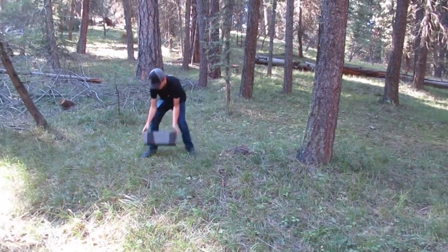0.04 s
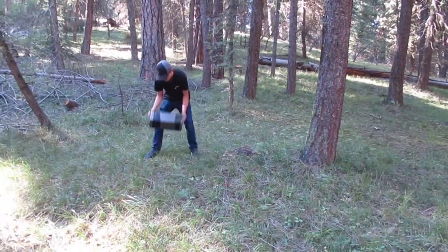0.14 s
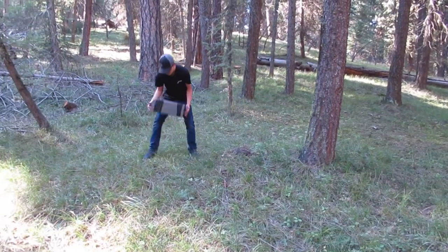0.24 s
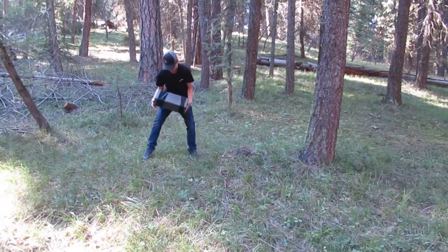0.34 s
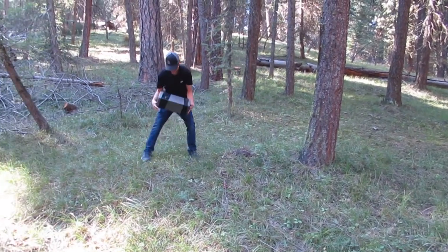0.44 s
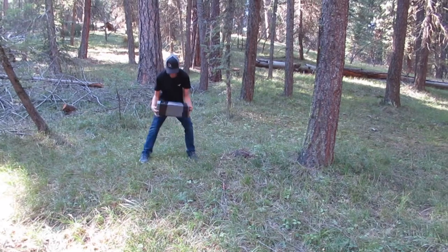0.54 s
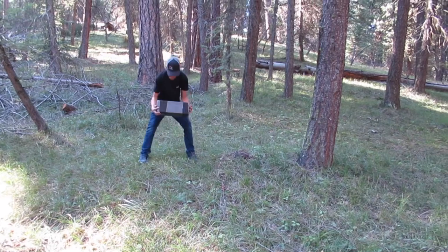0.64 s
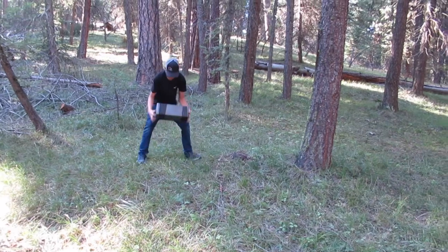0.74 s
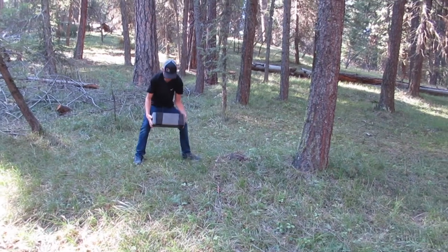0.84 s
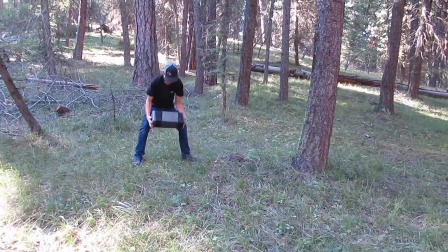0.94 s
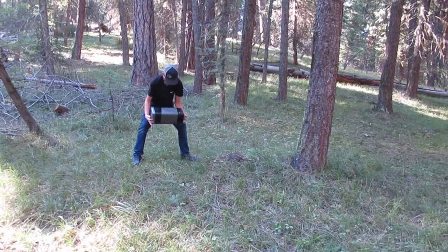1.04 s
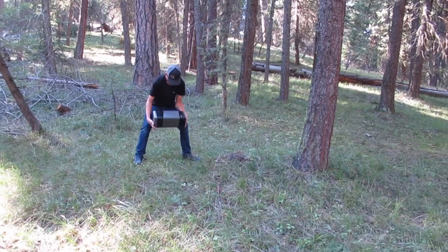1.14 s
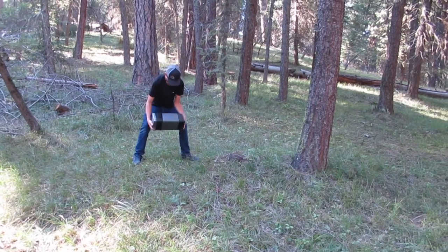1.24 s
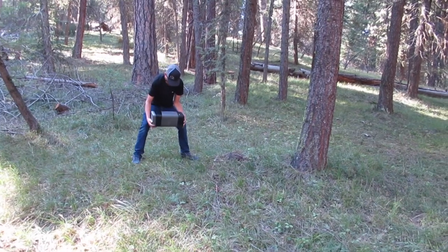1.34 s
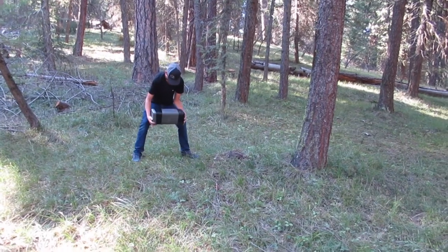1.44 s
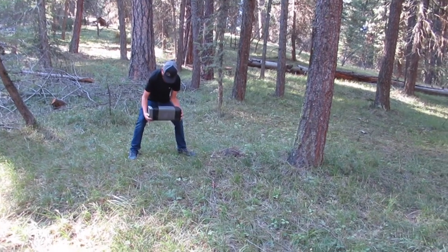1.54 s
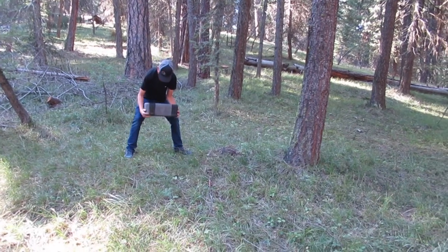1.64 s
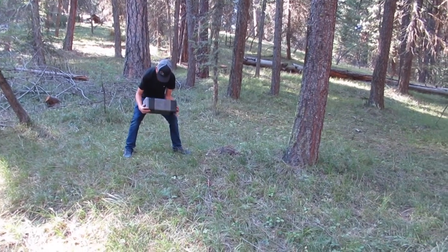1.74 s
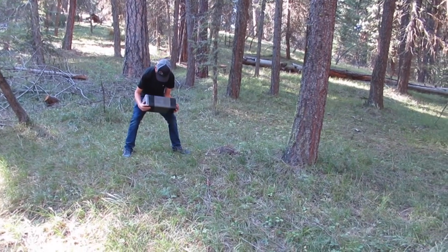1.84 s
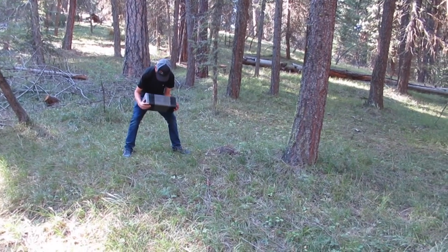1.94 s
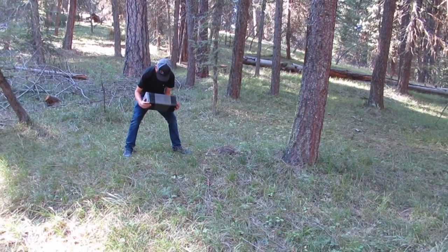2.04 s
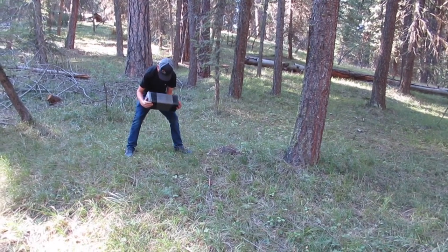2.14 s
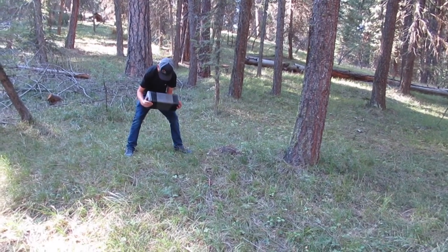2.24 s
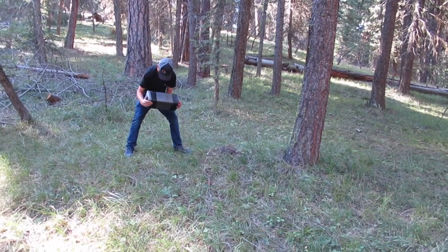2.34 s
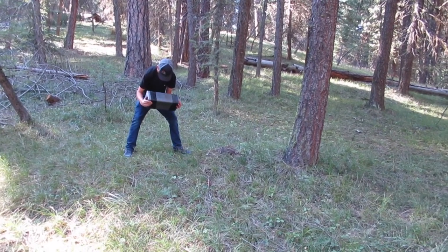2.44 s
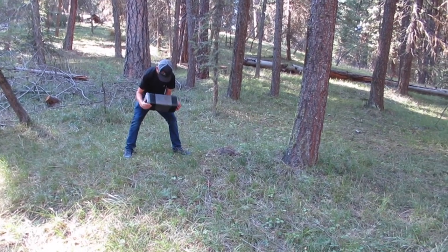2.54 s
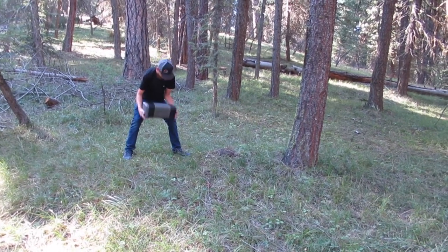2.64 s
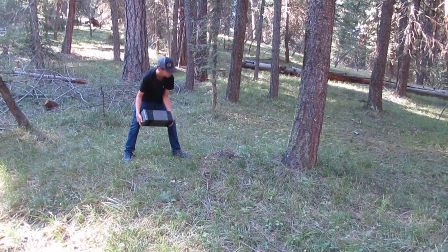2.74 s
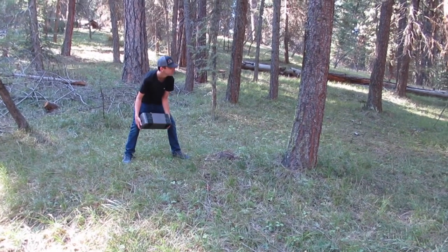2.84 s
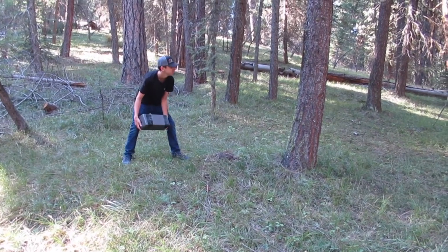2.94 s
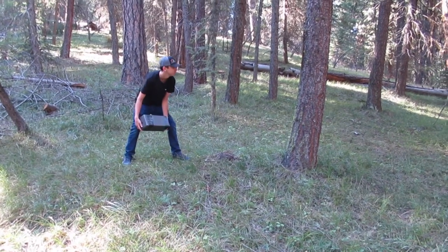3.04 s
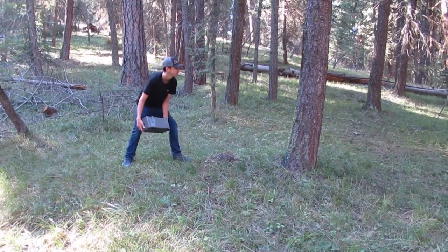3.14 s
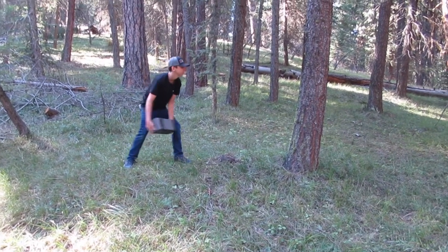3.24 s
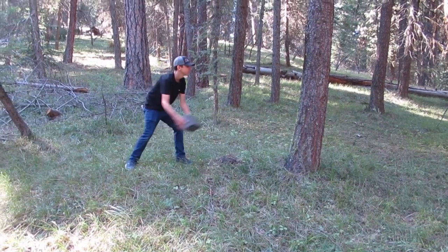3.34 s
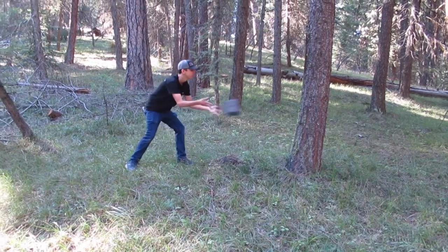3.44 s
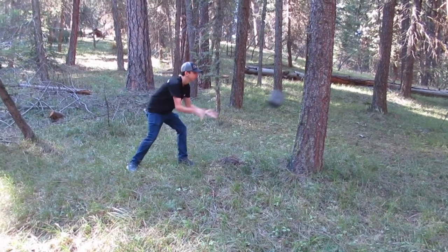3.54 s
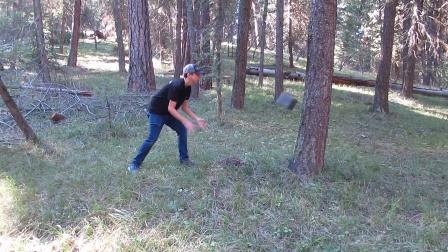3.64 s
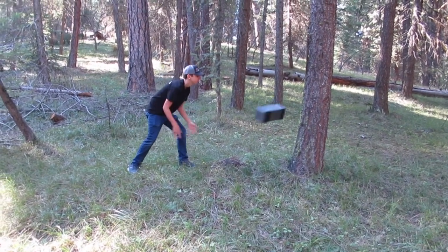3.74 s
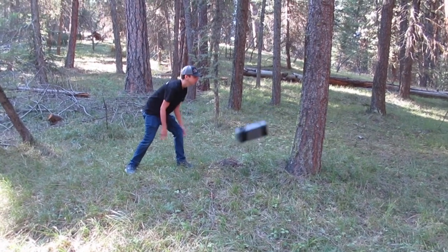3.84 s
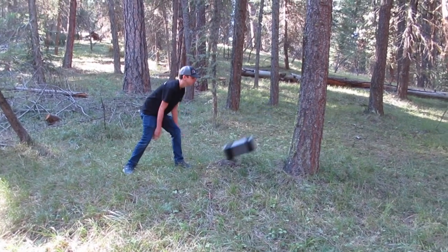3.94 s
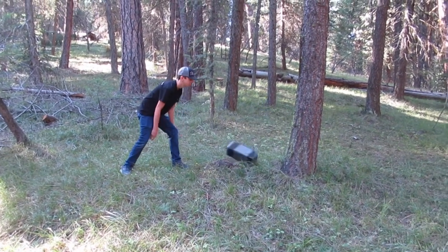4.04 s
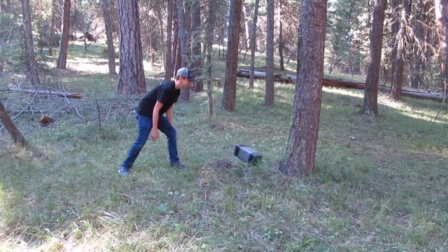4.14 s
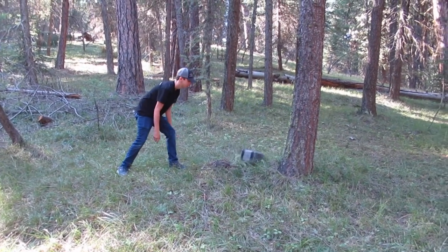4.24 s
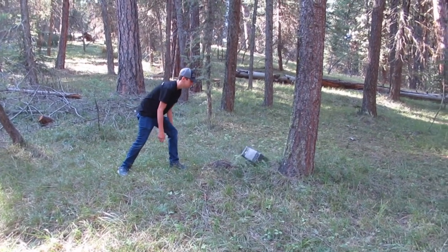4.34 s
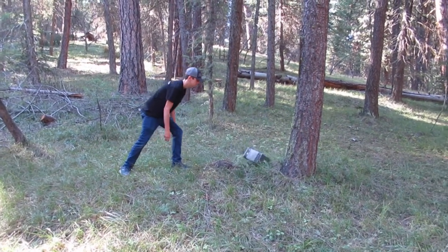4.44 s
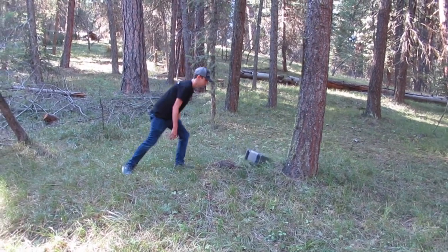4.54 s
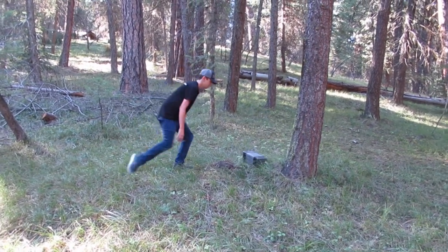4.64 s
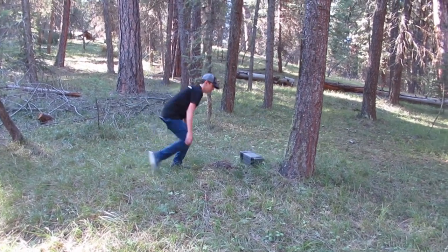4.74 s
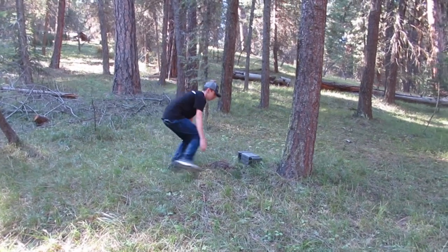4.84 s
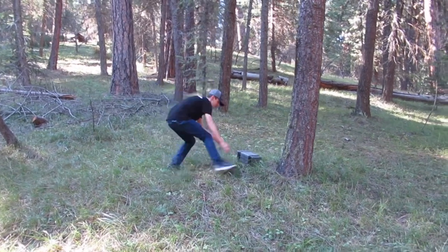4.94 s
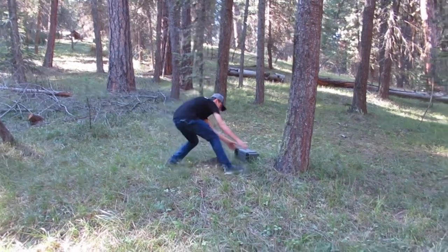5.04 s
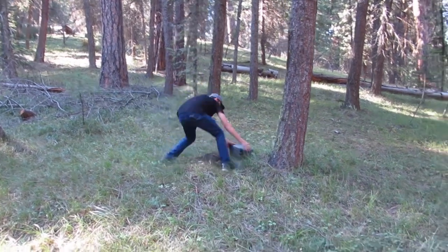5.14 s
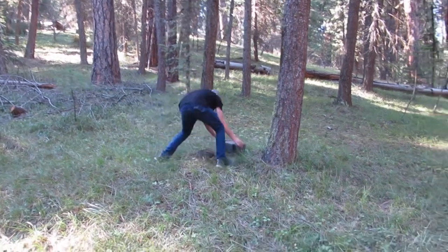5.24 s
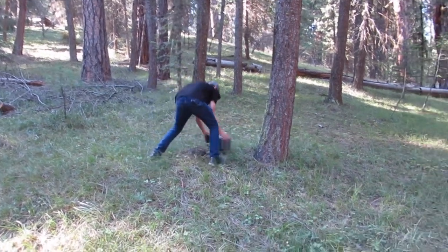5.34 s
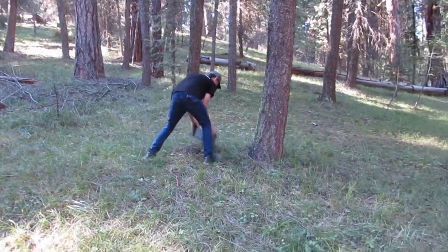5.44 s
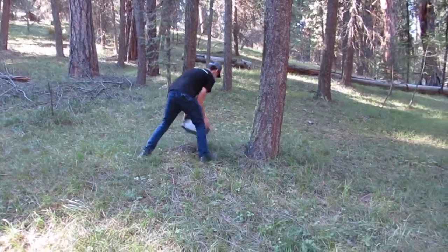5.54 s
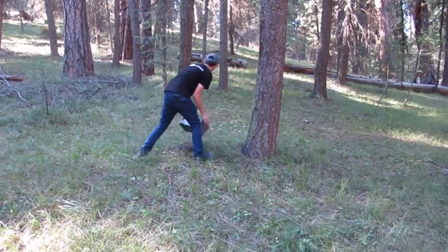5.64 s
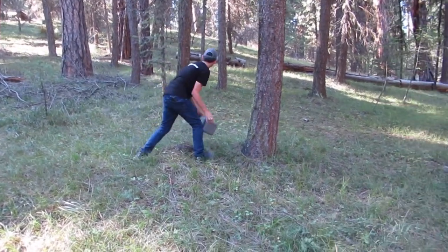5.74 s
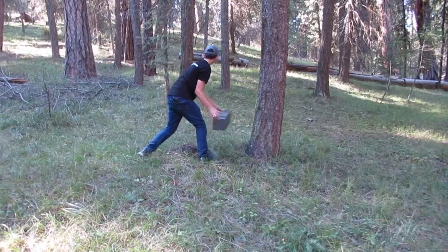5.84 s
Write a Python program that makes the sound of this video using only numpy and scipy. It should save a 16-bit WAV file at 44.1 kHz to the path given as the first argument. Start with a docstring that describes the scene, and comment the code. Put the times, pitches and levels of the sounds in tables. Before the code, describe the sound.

A stiff hollow box cracks loudly on a tree trunk, drops with a second knock and tumbles through dry grass in a quiet forest.

```python
"""A stiff cardboard box cracks on a tree trunk, drops and tumbles through grass: ringing walls, pumped air, crushed fibre.
Before the throw a man turns it in his hands (scuffs, grit and hollow taps) in a quiet forest.
Afterwards he steps over twigs, lifts the box and treads down heavily: snaps, thuds, crushed litter and brushed blades.
Trunks scatter the sounds back to a camera microphone, over a faint hush of treetops and hiss.
The camera's limiter ducks after the loudest blow and recovers slowly."""
import sys
import numpy as np
from scipy import signal
from scipy.fft import rfft, irfft
from scipy.io import wavfile
from scipy.ndimage import uniform_filter1d

SR = 44100
rng = np.random.default_rng(int(sys.argv[2]) if len(sys.argv) > 2 else 0)


def generate_wav(signal):
    """Clip the signal to [-1, 1] and save it as 16-bit WAV at the path in sys.argv[1]."""
    frames = np.transpose(np.atleast_2d(signal))
    scaled = np.clip(frames, -1, 1) * 32767
    pcm = np.round(scaled).astype(np.int16)
    wavfile.write(sys.argv[1], SR, pcm)


N = 259616
TIME = np.arange(N) / SR  # s
AGE = TIME[:SR // 4]  # time since a contact, s


# Ringing modes of the box walls: f/Hz, t60/s, level/dB struck on an end, level/dB struck on a side
WALL_MODES = [(262, 0.071, -0.5, -23.5), (345, 0.059, 6.5, -23.5), (485, 0.048, 5.5, -26),
              (584, 0.056, 13, -23.5), (692, 0.057, -18, -5), (760, 0.023, -13, -5), (1070, 0.03, -18, -14),
              (1152, 0.059, -6, -8), (1262, 0.093, -8, -32), (1420, 0.033, -33, -65),
              (1595, 0.048, 15, -53), (1690, 0.037, -14, -23), (1813, 0.064, -17, -19),
              (2273, 0.038, -3, -14.5), (2377, 0.061, -9.5, -31), (2800, .05, -38, -51),
              (2910, 0.12, -52, -40), (2990, 0.061, -25, -27)]
# Blows in the hands, on the trunk and on the ground:
# t/s, wall ring level/dB, side share (0-1), thump f/Hz, thump level/dB, crunch level/dB
BOX_BLOWS = [(.838, -26.5, 0.6, 293, -25.5, -49.5), (3.6322, 0.93, 0.37, 138, -12, -14.5),
             (3.6346, -16, 0.7, 320, -22, -4.5), (3.6447, -12, 0.8, 202, -21.5, -28),
             (3.958, -43, 0.92, 191, -35, -25.5), (3.9677, -14, 0.75, 177.5, -14, -11.5),
             (3.9725, -8.5, 1, 213, -24.5, -17), (3.988, -15, 1, 160, -34, -43),
             (4.097, -25.5, 0.84, 182, -40, -33.5), (4.232, -37, 0.8, 131, -59, -41),
             (4.254, -29.5, 0.7, 114, -49.5, -41), (5.177, -33, 0.7, 329, -31.5, -41),
             (5.664, -18, 1, 201, -26.5, -47)]
# Colour of crushed fibre, bark and litter: f/Hz, level/dB
CRUNCH_COLOUR = [(100, -6), (400, -4.5), (800, 4), (1300, 3.5), (2000, -8), (2900, -3), (4500, -14),
                 (7000, -14), (10000, -20), (15000, -32.5)]
# Colour of the box's knock averaged over all directions: f/Hz, level/dB
CLAP_COLOUR = [(50, 0), (140, -5.5), (600, -2.5), (1500, -4), (3000, -8), (6000, -15), (15000, -30)]
# Crushing decay at 0 dB crunch (s), and how many dB that time grows per dB less crunch
CRUSH_S, CRUSH_GROWTH = 0.006, 0.28


def box_blows(swell_s=0.0017, clap_db=15):
    """Each blow rings the walls, pumps the air inside and crushes fibres, bark or litter; softer crunches last longer.
    Returns the sound sent to the camera and the sound sent out among the trees."""
    ahead, around = np.zeros(N), np.zeros(N)
    hz, t60, end_db, side_db = np.transpose(WALL_MODES)[:, :, None]
    polarity = (-1) ** np.arange(len(WALL_MODES))[:, None]  # neighbouring modes push opposite ways
    rings = polarity * np.sin(2 * np.pi * hz * AGE) * np.exp(-np.log(1000) * AGE / t60)
    swell = 1 - np.exp(-AGE / swell_s)  # the board gives way before it springs back
    # every direction gets another mix of modes, so together they blur into a broad clap
    clap = colour(signal.unit_impulse(len(AGE)), CLAP_COLOUR)

    for s, ring_db, side, thump_hz, thump_db, crunch_db in BOX_BLOWS:
        mode_db = end_db + np.clip(side, 0, 1) * (side_db - end_db)
        walls = (undb(ring_db + mode_db) * rings).sum(axis=0)
        pumped_air = undb(thump_db) * thump(thump_hz, cycles=0.9)
        crush_s = CRUSH_S * undb(-CRUSH_GROWTH * crunch_db)
        crush = swell * np.exp(-AGE / crush_s)
        crunch = undb(crunch_db) * burst(crush, CRUNCH_COLOUR, rate=9000)
        add(ahead, s, swell * walls + pumped_air + crunch)
        add(around, s, undb(ring_db + clap_db) * clap)
    return ahead, around


LANDS_S, TURN_S = 3.975, 0.14  # landing time and time per turn
ROLL_DB, ROLL_FADE_DB_PER_S, TURN_DB = -39, 36.5, 2


def rolling(onset_s=0.0052):
    """How hard the tumbling box stirs the grass: a swell on every turn, dying away as it slows."""
    t = np.maximum(TIME - LANDS_S, 0)
    level_db = ROLL_DB - ROLL_FADE_DB_PER_S * t + TURN_DB * np.cos(2 * np.pi * t / TURN_S)
    return np.minimum(t / onset_s, 1) * undb(level_db)


# Hands gripping and sliding on the box: t/s, scuff level/dB, fall/s, grit level/dB
HAND_GRIPS = [(.267, -37.5, 0.0087, -64), (.345, -35, 0.0033, -61), (.371, -34, .0045, -43.5),
              (.558, -51, 0.025, -45), (.68, -47.5, 0.017, -68), (.712, -42.5, 0.013, -53.5),
              (.832, -33.5, 0.0098, -38.5), (.882, -46, 0.019, -47), (1.193, -37, 0.0081, -57),
              (1.209, -44, 0.013, -45.5), (1.231, -31.5, 0.0084, -54), (2.747, -37, 0.0062, -46),
              (2.756, -38.5, 0.0079, -51), (3.423, -40.5, 0.019, -42), (5.11, -38, 0.006, -39.5),
              (5.18, -37, 0.0027, -32.5), (5.25, -43.5, 0.016, -46.5), (5.297, -39.5, 0.0083, -63),
              (5.672, -31.5, 0.0072, -52), (5.728, -45, 0.023, -65)]
# Colour of the hollow palm scuff: f/Hz, level/dB
PALM_COLOUR = [(80, -26), (300, -14), (480, -7), (640, 3.5), (760, 0), (900, -13.5), (1200, -10.5),
               (2200, -19.5), (4000, -25), (14000, -50)]
# Colour of dry skin on the board: f/Hz, level/dB
GRIT_COLOUR = [(100, -2), (400, 4.5), (1000, -1), (2500, 2.5), (4500, -7), (8000, -7), (12000, -11.5),
               (15000, -16)]
# A grip builds up over GRIP_RISE times its fall and bumps the air in the box; bump dB relative to the scuff
GRIP_RISE, BUMP_HZ, BUMP_DB = 1.33, 227, -4


def hands():
    """Palms stick and slip on the board: a hollow scuff, dry grit and a soft bump."""
    out = np.zeros(N)
    lead = AGE[-1] / 2  # s of room for the build-up
    t = AGE - lead
    for s, db, fall, grit_db in HAND_GRIPS:
        pressure = np.exp(-np.maximum(-t / GRIP_RISE, t) / fall)
        scuff = undb(db) * burst(pressure, PALM_COLOUR, rate=4000)
        grit = undb(grit_db) * burst(pressure, GRIT_COLOUR, rate=7000)
        add(out, s - lead, scuff + grit)
        add(out, s - .003, undb(db + BUMP_DB) * thump(BUMP_HZ, cycles=0.34))
    return out


# Fingers and palms tapping the box: t/s, peak level/dB
BOX_TAPS = [(.369, -32.5), (1.191, -32), (1.2285, -35), (2.7435, -30.5), (2.755, -33.5), (3.4215, -31),
            (3.571, -38), (5.107, -36)]
TAP_HZ, TAP_S = 648, 0.0019  # hollow pitch, time to the envelope's peak


def taps():
    """A soft fingertip draws a few hollow cycles from the held box."""
    out = np.zeros(N)
    ring = np.sin(2 * np.pi * TAP_HZ * AGE) * AGE / TAP_S * np.exp(1 - AGE / TAP_S)
    for s, db in BOX_TAPS:
        add(out, s, undb(db) * ring)
    return out


# Twigs snapping: t/s, peak level/dB, ring f/Hz
TWIG_SNAPS = [(0.874, -27, 2290), (1.331, -35, 2840), (1.429, -36.5, 2650), (3.945, -29, 980),
              (4.7667, -24, 770), (4.7947, -27.5, 2300), (4.994, -30, 1970), (5.058, -18.5, 1150),
              (5.1247, -28.5, 2870), (5.178, -32, 2380), (5.745, -20, 1170)]
# Colour of splintering wood: f/Hz, level/dB
SPLINTER_COLOUR = [(100, -7), (400, 10), (2500, 5), (4500, -12), (8000, -12), (15000, -10)]
# Feet on the soft soil: t/s, thud level/dB, f/Hz
FOOTSTEPS = [(.341, -37.5, 160), (0.369, -38, 109), (0.796, -36, 153), (0.834, -32, 150), (5.025, -39, 172),
             (5.116, -36, 226), (5.66, -20, 112)]
# Decay of a 1 kHz twig (s); higher twigs die sooner by this power of their pitch
TWIG_S, TWIG_POWER = 0.0014, 0.68
# Litter dB relative to the thud; decay at a 0 dB thud (s), and dB that time shrinks per dB less thud
LITTER_DB, LITTER_S, LITTER_GROWTH = -14, 0.46, .95


def underfoot(splinter=1.36, sole_s=0.0084):
    """Twigs break with a click and a brief ring; heels thud on soil and crush litter, heavier steps for longer."""
    out = np.zeros(N)
    for s, db, hz in TWIG_SNAPS:
        fade = np.exp(-AGE / TWIG_S * (hz / 1000) ** TWIG_POWER)
        ring = fade * np.sin(2 * np.pi * hz * AGE)
        snap = ring + splinter * burst(fade, SPLINTER_COLOUR, rate=17000)
        add(out, s, undb(db) * snap / np.abs(snap).max())
    for s, db, hz in FOOTSTEPS:
        litter_s = LITTER_S * undb(LITTER_GROWTH * db)
        weight = (1 - np.exp(-AGE / sole_s)) * np.exp(-AGE / litter_s)
        litter = undb(LITTER_DB) * burst(weight, CRUNCH_COLOUR, rate=5000)
        add(out, s, undb(db) * (thump(hz, cycles=0.49) + litter))
    return out


# Legs and arms sweeping through the grass: t/s, stirring level/dB, half length/s
GRASS_SWEEPS = [(.42, -58, .06), (.97, -58, .22), (4.48, -55, .14), (4.76, -50.5, .1), (5.05, -46, .1),
                (5.32, -46, .08), (5.72, -54, .2)]
# Colour of dry blades: f/Hz, level/dB
BLADE_COLOUR = [(100, 2), (400, 1.5), (1000, 2), (2500, 2.5), (4500, -4.5), (8000, -9.5), (12000, -13),
                (15000, -14.5)]


def grass(flutter_db=1.66, blades_db=-1, needles_db=-7, tips_db=-9):
    """Dry blades brush and crackle under the box and the legs, with snapping needles and hissing tips."""
    power = rolling() ** 2
    for s, db, half_s in GRASS_SWEEPS:
        power = power + undb(db) ** 2 * np.exp(-((TIME - s) / half_s) ** 2)
    stir = np.sqrt(power) * undb(flutter_db * walk(60))
    crackle = colour(grains(N, rate=10000, spread_db=2.5), BLADE_COLOUR)
    return stir * (undb(blades_db) * crackle + undb(needles_db) * needles() + undb(tips_db) * tips())


def needles(rate=22, sharpness=5, count=9):
    """Dead needles and stalks snap at random, each length at its own pitch; rms 1."""
    snaps = np.zeros(N)
    for hz in np.geomspace(900, 9000, count):
        clicks = unit(grains(N, rate=rate, spread_db=1.0))
        b, a = signal.iirpeak(hz, sharpness, fs=SR)
        snaps += signal.lfilter(b, a, clicks) / np.sqrt(hz)
    return unit(snaps)


def tips(low_hz=6000, high_hz=13000):
    """The fine hiss of grass tips, rms 1."""
    ticks = grains(N, rate=10000, spread_db=2.5)
    band = signal.butter(2, [low_hz, high_hz], "band", fs=SR, output="sos")
    return unit(signal.sosfilt(band, ticks))


SWISH_S, SWISH_DB, SWISH_WIDTH_S = 5.355, -51, .05  # middle, level, width


def swish():
    """Grass tips sweep along the box as it is lifted."""
    sweep = np.exp(-.5 * ((TIME - SWISH_S) / SWISH_WIDTH_S) ** 2)
    return undb(SWISH_DB) * tips() * sweep


# Colour of the sound the trunks send back: f/Hz, level/dB
TRUNK_COLOUR = [(60, -10.5), (300, -1), (900, -1.5), (2500, -7.5), (15000, -12)]
ECHO_S, ECHO_DB = .051, -29  # one big trunk throws a clear echo back; level before the trunk colour


def forest(x, near_db=-26, near_t60=0.31, far_db=-27, far_t60=1.22, absorb_hz=4500):
    """Scatter from the nearest trunks, one clear echo, then a far wash that loses its treble first."""
    t = TIME[:SR]
    arrival = np.clip((t - .016) / .012, 0, 1)  # nothing scatters back before 16 ms
    scatter = grains(SR, rate=12000, spread_db=1.0) * undb(1.0 * walk(90)[:SR]) * arrival
    near = scatter * np.exp(-np.log(1000) * t / near_t60)

    hz, spectrum, far = np.fft.rfftfreq(SR, 1 / SR), rfft(scatter), 0
    edges = [0, 700, 1400, 2200, 3200, 4500, 7000, 16000]  # Hz
    for lo, hi in zip(edges, edges[1:]):
        t60 = far_t60 / (1 + ((lo + hi) / 2 / absorb_hz) ** 2)  # needles and air soak up the highs
        band = irfft(spectrum * (hz >= lo) * (hz < hi), SR)
        far = far + band * np.exp(-np.log(1000) * t / t60)

    echoes = undb(near_db) * near / np.linalg.norm(near) + undb(far_db) * far / np.linalg.norm(far)
    echoes[int(ECHO_S * SR)] += undb(ECHO_DB)
    return signal.fftconvolve(x, colour(echoes, TRUNK_COLOUR))[:N]


# Colour of the still air: f/Hz, level/dB
AIR_COLOUR = [(25, -3.5), (70, -7.5), (160, -5), (350, -2), (450, -5.5), (650, -4), (950, -6.5), (1400, -9),
              (1950, -8.5), (4200, -16), (7500, -16.5), (11000, -19), (15000, -28.5)]
AIR_DB = -54.5  # rms at the microphone


def air(drift_db=0.05):
    """A faint, even hush of distant treetops and microphone hiss."""
    return undb(AIR_DB + drift_db * walk(3.43)) * colour(rng.standard_normal(N), AIR_COLOUR)


def undb(db):
    """Decibels to gain."""
    return 10 ** (np.asarray(db) / 20)


def unit(x):
    """Scale to rms 1."""
    return x / np.sqrt(np.mean(x ** 2))


def add(out, s, x):
    """Mix x into out from time s."""
    i = max(int(s * SR), 0)
    out[i:i + len(x)] += x[:max(N - i, 0)]


def colour(x, points, size=2048):
    """Causal minimum-phase filter of unit energy through (f/Hz, level/dB) points."""
    hz, db = np.transpose(points)
    log_hz = np.log(np.fft.rfftfreq(size, 1 / SR) + 1)
    log_gain = np.log(undb(np.interp(log_hz, np.log(hz), db)))
    # folding the cepstrum forward in time puts the energy as early as possible
    cepstrum = irfft(log_gain)
    cepstrum[1:size // 2] *= 2
    cepstrum[size // 2 + 1:] = 0
    response = irfft(np.exp(rfft(cepstrum)))
    return signal.fftconvolve(x, response / np.linalg.norm(response))[:len(x)]


def grains(count, rate, spread_db):
    """Random tiny clicks of uneven size, rate per second, rms 1."""
    sizes = undb(spread_db * np.minimum(rng.exponential(size=count), 5))
    return unit(sizes * rng.standard_normal(count) * (rng.random(count) < rate / SR))


def burst(envelope, points, rate):
    x = colour(grains(len(envelope), rate, spread_db=2.0) * envelope, points)
    return x * np.linalg.norm(envelope) / np.linalg.norm(x)


def walk(rate):
    """Smooth random drift, rms 1, with rate new values per second."""
    k = int(SR / rate)
    steps = np.repeat(rng.standard_normal(N // k + 1), k)[:N]
    return unit(uniform_filter1d(steps, k))


def thump(hz, cycles):
    """A dull push of air that swells and dies within a few cycles; its envelope peaks at 1."""
    u = AGE * hz / cycles
    return -np.sin(2 * np.pi * hz * AGE) * u ** 2 * np.exp(2 - 2 * u)


def scene():
    """All sources in the clearing, their echoes and the still air."""
    knocks, claps = box_blows()
    held = hands() + taps()
    ground = underfoot() + grass() + swish()
    screened = .35 * held  # the man's body screens the held box from the trees
    echoes = forest(claps + screened + ground)
    return (knocks + held + ground + echoes + air())[None]


TOP_HZ = 15250  # upper edge of the camera's sound


def record(dry, limit_db=-6, release_db_per_s=15, low_cut_hz=55):
    """The camera thins the deep bass; its limiter ducks at once and recovers slowly; the top is cut."""
    x = signal.sosfilt(signal.butter(2, low_cut_hz, "high", fs=SR, output="sos"), dry)
    power = uniform_filter1d(x[0] ** 2, SR // 250)  # 4 ms average
    over_db = np.maximum(10 * np.log10(np.abs(power) + 1e-12) - limit_db, 0)
    # a running maximum on a rising ramp holds each peak and lets it fall at the release rate
    recovery = release_db_per_s * TIME
    duck_db = np.maximum.accumulate(over_db + recovery) - recovery
    limited = np.clip(x * undb(-duck_db), -.94, .94)
    return signal.sosfilt(signal.ellip(10, .2, 80, TOP_HZ, fs=SR, output="sos"), limited)


dry = scene()
out = record(dry)
generate_wav(out)
```